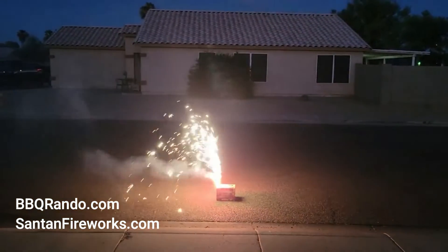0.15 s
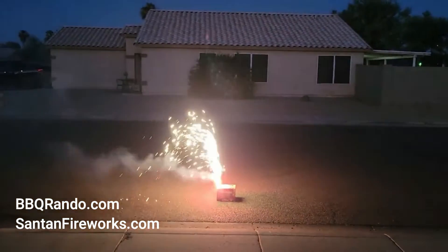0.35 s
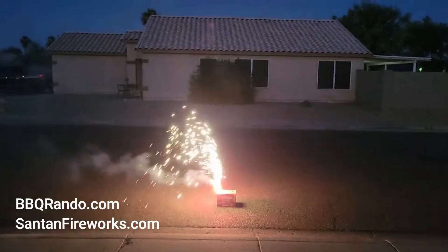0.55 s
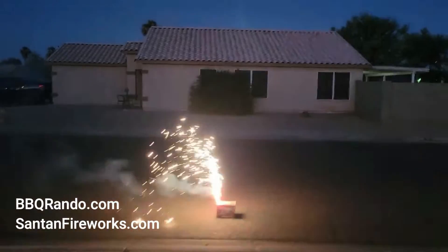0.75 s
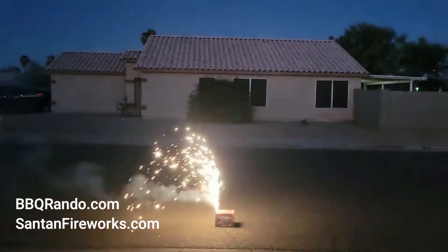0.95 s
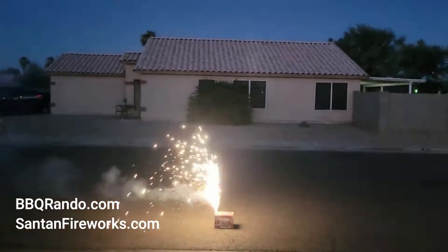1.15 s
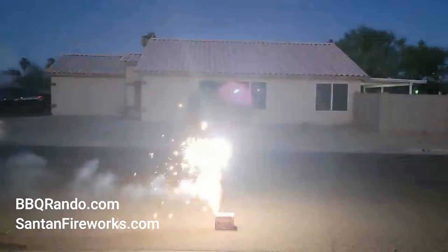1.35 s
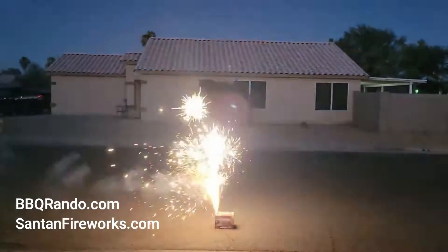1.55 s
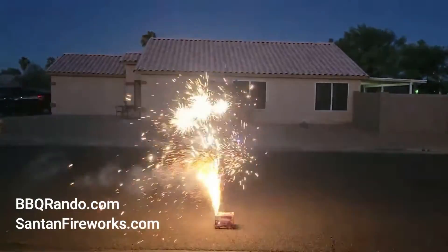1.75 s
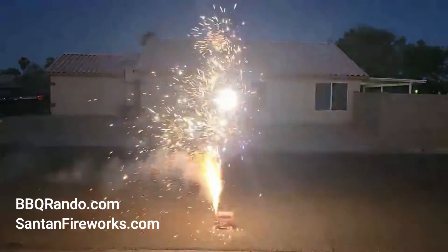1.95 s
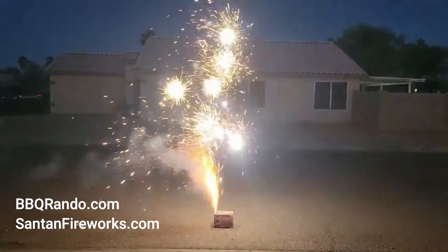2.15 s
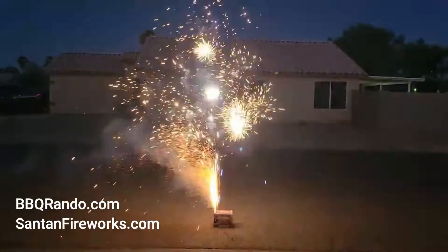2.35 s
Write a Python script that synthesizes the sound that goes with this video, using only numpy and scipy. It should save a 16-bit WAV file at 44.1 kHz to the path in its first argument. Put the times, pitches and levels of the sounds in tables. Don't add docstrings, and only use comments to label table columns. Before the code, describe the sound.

A ground firework fountain roars softly with small spits, nearly dies at one second, then a brighter hiss builds and bursts into loud, dense crackling, outdoors on a quiet street, captured by a phone a few metres away.

```python
import sys
import numpy as np
from scipy import signal
from scipy.fft import rfft, irfft
from scipy.io import wavfile
from scipy.ndimage import uniform_filter1d

SR = 44100
rng = np.random.default_rng(int(sys.argv[2]) if len(sys.argv) > 2 else 0)


def gain_from_decibels(decibels):
    exponent = np.asarray(decibels, float) / 20
    return 10 ** exponent


def unload_wav(signal):
    wavfile.write(
        sys.argv[1],
        SR,
        np.round(np.clip(np.atleast_2d(signal).T, -1, 1) * 32767).astype(np.int16),
    )


N = 110250
TIME = np.arange(N) / SR


def read(points, hz):
    f, value = np.transpose(points)
    return np.interp(np.log(hz + 1), np.log(f + 1), value)


def evened(x):
    return x / np.sqrt(np.mean(x ** 2) + 1e-20)


def curve(points):
    s, db = np.transpose(points)
    return gain_from_decibels(np.interp(TIME, s, db))


def causal(db):
    log_gain = np.log(gain_from_decibels(np.concatenate([db, db[-2:0:-1]])))
    return np.exp(log_gain - 1j * signal.hilbert(log_gain).imag)[:len(db)]


def tinted(x, tone):
    taps = irfft(causal(read(tone, np.fft.rfftfreq(4096, 1 / SR))))[:3000]
    return signal.oaconvolve(x, taps[None] / np.linalg.norm(taps))[:, :N]


def wander(top_hz):
    waves = [np.sin(2 * np.pi * (f * TIME + rng.random())) / np.sqrt(f)
             for f in np.geomspace(3, top_hz, num=24)]
    return evened(sum(waves))


def snaps(per_s, spread_db):
    size = gain_from_decibels(spread_db * np.minimum(rng.exponential(size=N), 4))
    size = size * (rng.random(N) < per_s / SR)
    return evened(size * rng.standard_normal((2, N)))


def shape(start, length, rise, fall):
    t = TIME - start
    return np.clip(t / rise, 0, 1) ** 2 * np.exp(-np.maximum(t - length, 0) / fall)


def jet(level, tone, flutter_db, grit, like):
    gas = rng.standard_normal((2, N)) + grit * snaps(1500, 3.5)
    gas = np.array([gas[0], like * gas[0] + np.sqrt(1 - like ** 2) * gas[1]])
    return tinted(evened(gas) * curve(level) * gain_from_decibels(flutter_db * wander(120)), tone)


# (frequency [Hz], level [dB])
STREET_TONE = [(22, -26), (40, -5), (58, -8), (120, -13.5), (250, -31.5), (600, -21.5), (3000, -51),
               (16000, -43)]


def street_rumble():
    return gain_from_decibels(-46.5 + 1.7 * wander(8.2)) * tinted(rng.standard_normal((2, N)), STREET_TONE)


# (time [s], level [dB])
ROAR_LEVEL = [
    (0, -36),
    (.25, -37),
    (.5, -36.5),
    (.8, -35.5),
    (.97, -37.5),
    (1.03, -47),
    (1.3, -51),
    (2.5, -81.5),
]
# (frequency [Hz], level [dB])
ROAR_TONE = [(130, -7), (700, -6), (1050, -14), (1800, -5.5), (2700, -9.5), (3250, -17), (4600, -18.5),
             (16000, -37)]


def roar():
    x = jet(ROAR_LEVEL, ROAR_TONE, flutter_db=0.73, grit=0.48, like=.12)
    open_s, shut_hz, shut_share = 0.29, 2120, 0.9
    shut = np.clip(shut_share * (1 - TIME / open_s), 0, 1)
    muffled = signal.filtfilt(*signal.butter(3, shut_hz, fs=SR), x)
    return x + shut * (muffled - x)


# (frequency [Hz], level [dB])
WHISPER_TONE = [(2700, -10), (3300, 0), (4000, 10.5), (4600, 8.5), (5300, -11), (6800, -3), (10500, -11),
                (12500, -25)]


def whisper():
    start_db, fall_db_per_s = -37.5, 30
    return tinted(rng.standard_normal((2, N)) * gain_from_decibels(start_db - fall_db_per_s * TIME), WHISPER_TONE)


# (time [s], level [dB])
HISS_LEVEL = [
    (0, -51),
    (.3, -71),
    (.9, -78),
    (1.03, -41.5),
    (1.3, -36.5),
    (1.46, -33.5),
    (1.53, -31),
    (1.7, -32),
    (2.2, -33),
    (2.5, -31.5),
]
# (frequency [Hz], level [dB])
HISS_TONE = [(500, -5.5), (1400, -1), (2300, 11.5), (3400, 3.5), (6000, 5.5), (10500, -5.5), (13500, -7.5),
             (16000, -15.5)]


def hiss():
    return jet(HISS_LEVEL, HISS_TONE, flutter_db=2.1, grit=0.32, like=.4)


# (time [s], level [dB], length [s])
SPITS = [(.324, -31, .002), (.3765, -29, .0015), (.608, -28, .0035), (.6358, -25, .0012),
         (.7752, -29, .003), (.7832, -25, .002), (.796, -35, .0015), (.838, -32, .002), (.918, -36, .002),
         (.9443, -31, .002), (.583, -36, .002), (.258, -38, .002), (.394, -37, .0015), (.961, -34, .002),
         (1.255, -31, .002), (1.447, -28, .002), (1.475, -22, .002)]
# (frequency [Hz], level [dB])
SPIT_TONE = [(300, -8), (1400, 2), (2500, 4.5), (5000, 7.5), (8000, -8), (11000, -6.5), (14000, -15),
             (16500, -10)]


def spits():
    level = sum(gain_from_decibels(db - .5) * shape(s, n, rise=.0003, fall=.0006) for s, db, n in SPITS)
    return tinted(level * snaps(26000, 0), SPIT_TONE)


# (time [s], level [dB], length [s], thump level [dB])
POPS = [(1.518, -21, .003, -47), (1.5455, -11, .006, -42), (1.552, -13, .005, -46), (1.560, -18, .002, -60),
        (1.565, -13, .004, -32), (1.632, -12, .008, -34), (1.653, -11, .005, -42), (1.757, -15, .006, -40),
        (1.8145, -8, .005, -42), (1.822, -10, .004, -38), (1.854, -14, .004, -40), (1.895, -14, .007, -41),
        (1.9965, -10, .005, -48), (2.0355, -10, .004, -39), (2.042, -9, .006, -39), (2.0795, -7, .006, -41),
        (2.1225, -11, .005, -43), (2.1685, -14, .003, -46), (2.294, -16, .004, -40),
        (2.308, -13, .004, -28), (2.350, -15, .004, -42), (2.362, -9, .006, -38), (2.450, -13, .006, -44),
        (2.479, -11, .004, -41)]


def thumps():
    thump_hz, thump_s = 90, .006
    out = 0
    for s, _, _, db in POPS:
        u = np.maximum(TIME - s, 0)
        swell = u / thump_s * np.exp(-u / thump_s)
        out = out + gain_from_decibels(db + 5.5) * swell * np.sin(2 * np.pi * thump_hz * rng.uniform(1.0, 1.02) * u)
    return out


# (time [s], length [s], level [dB], low part relative to that level [dB])
SWARMS = [(1.572, .055, -35, -2), (1.640, .028, -28, 1), (1.672, .03, -32, 0), (1.700, .045, -25, 2),
          (1.742, .022, -27, 0), (1.783, .018, -28, 2), (1.826, .010, -26, 2), (1.857, .035, -27, 0),
          (1.893, .035, -25, -1), (1.931, .040, -23.5, 0), (1.998, .022, -23, 1), (2.044, .024, -24, 2),
          (2.083, .032, -24, 0), (2.126, .022, -31, -2), (2.145, .022, -28, 1), (2.205, .065, -32, -4),
          (2.164, .040, -23, 3), (2.268, .05, -24, 6), (2.318, .050, -22, 2), (2.380, .030, -25, 1),
          (2.415, .03, -33, -2), (2.444, .030, -25, 4), (2.484, .02, -30, 2)]
# (frequency [Hz], level [dB])
SNAP_TONE = [(80, -1.5), (350, -4), (1400, 0), (3000, 2), (5500, 8.5), (9000, -0.5), (13000, 0.5),
             (16500, -7)]


def stars():
    pops = sum(gain_from_decibels(db - 9) * shape(s, n, .3 * n, .003) for s, db, n, _ in POPS)
    swarms, lows = 0, 0
    for s, n, db, low_db in SWARMS:
        burst = shape(s, n, rise=.009, fall=.008)
        swarms = swarms + gain_from_decibels(db + 1.07) * burst
        lows = lows + gain_from_decibels(db + low_db + 0.6) * burst
    cloud = gain_from_decibels(1.3 * wander(300)) * snaps(14000, 1.1)
    deep = signal.lfilter(*signal.butter(2, 3200, fs=SR), cloud)
    crackle = pops * snaps(26000, 1.6) + swarms * (cloud - deep) + lows * deep
    return tinted(crackle, SNAP_TONE) + thumps()


def patchy(x):
    z = signal.stft(x, SR, nperseg=256)[2]
    field = uniform_filter1d(rng.standard_normal(z.shape[1:]), size=14, axis=0)
    field = uniform_filter1d(field, size=7, axis=1)
    return signal.istft(z * gain_from_decibels(2.5 * evened(field)), SR, nperseg=256)[1][:, :N]


# (time [s], peak level [dB])
CRACKS = [(1.5477, -10.0), (1.5508, -10.0), (1.5541, -11.0), (1.5558, -11.0), (1.5681, -10.0),
          (1.6341, -9.0), (1.6574, -9.0), (1.74, -9.0), (1.7571, -12.0), (1.7616, -12.0), (1.8157, -8.0),
          (1.8171, -8.0), (1.8234, -9.0), (1.8252, -7.0), (1.8298, -10.0), (1.8563, -12.0), (1.8959, -12.0),
          (1.898, -12.0), (1.9119, -13.0), (1.9978, -7.0), (2.0, -6.0), (2.0196, -11.0), (2.0365, -8.0),
          (2.0398, -10.0), (2.0435, -10.0), (2.0449, -8.0), (2.0494, -10.0), (2.083, -5.0), (2.0896, -11.0),
          (2.0964, -11.0), (2.1121, -11.0), (2.1239, -10.0), (2.1258, -10.0), (2.1697, -7.0), (2.18, -11.0),
          (2.1814, -11.0), (2.1838, -10.0), (2.1893, -10.0), (2.1948, -11.0), (2.1966, -11.0),
          (2.2812, -12.0), (2.2922, -10.0), (2.2979, -10.0), (2.3097, -9.0), (2.3113, -9.0),
          (2.3344, -11.0), (2.3463, -12.0), (2.3507, -11.0), (2.3529, -10.0), (2.3601, -10.0),
          (2.3657, -6.0), (2.3673, -8.0), (2.3919, -13.0), (2.4538, -12.0), (2.4562, -12.0),
          (2.4661, -13.0), (2.4807, -11.0), (2.4822, -9.0)]


def cracks():
    out = np.zeros((2, N))
    u = np.arange(40) / SR / .00007
    wave = (1 - u) * np.exp(-u)
    for (s, db), (late, slow) in zip(CRACKS, rng.random((len(CRACKS), 2))):
        for row, lag in zip(out, (0, 0.00049 * late)):
            row[round((s + lag) * SR):][:40] -= gain_from_decibels(db + 2.5) * (wave + slow * np.roll(wave, 3))
    return tinted(out, SNAP_TONE)


def houses(x):
    echo_db, t60_s, top_hz = -9, 0.54, 13400
    t = np.arange(SR // 2) / SR
    hits = (rng.random((2, len(t))) < .05) * (t > .008)
    taps = rng.standard_normal((2, len(t))) * hits * gain_from_decibels(-60 * t / t60_s)
    taps = signal.lfilter(*signal.butter(1, top_hz, fs=SR), taps)
    return gain_from_decibels(echo_db) * signal.fftconvolve(x, taps / np.linalg.norm(taps[0]), axes=1)[:, :N]


def scene():
    fire = roar() + whisper() + hiss() + spits() + patchy(stars()) + cracks()
    return fire + houses(fire) + street_rumble()


# (frequency [Hz], level [dB])
LEFT_TONE = [(600, 2), (1300, 2.5), (2400, 6.5), (3300, -1.5), (5200, -6), (7500, 1.5), (10500, 0),
             (13500, 5)]
RIGHT_TONE = [(1700, 3), (3200, -5.5), (4200, -3), (5500, 0.5), (7400, -2), (8900, -2.5), (11000, -3.5),
              (13500, 4)]
# (frequency [Hz], phase [rad])
LEAD = [(200, 0.22), (2500, 0.7), (3300, 1.68), (4400, 2.36), (6000, 2.1), (8000, 1), (9500, -.4),
        (15000, -.6)]
# (frequency [Hz], correlation [0-1])
SAME = [(40, .8), (200, .96), (550, .66), (1700, .88), (2600, .74), (3300, .35), (4300, .76), (9000, .25)]
# (frequency [Hz], width [Hz], level [dB])
DIPS = [(549, 81, -6.5), (962, 142, -4), (8310, 190, -6), (11320, 700, -5.5)]


def microphone(dry):
    hz = np.fft.rfftfreq(N, 1 / SR)
    dips_db = sum(db * np.exp(-((hz - f) / width) ** 2) for f, width, db in DIPS)
    low_cut = hz ** 2 / (hz ** 2 + 51.5 ** 2)
    a, b = rfft(dry, axis=1) * gain_from_decibels(dips_db) * low_cut
    same = np.clip(read(SAME, hz), 0, 1)
    lead = np.exp(.5j * read(LEAD, hz))
    left = a * gain_from_decibels(read(LEFT_TONE, hz)) * lead
    right = (same * a + np.sqrt(1 - same ** 2) * b) * gain_from_decibels(read(RIGHT_TONE, hz)) / lead
    return irfft(np.array([left, right]) / (1 + (hz / 15850) ** 400), N, axis=1)


def rebalanced(ports):
    centre_hz, width_hz, share, away_s = 2100, 420, 0.93, 0.55
    edges = [centre_hz - width_hz, centre_hz + width_hz]
    band = signal.filtfilt(*signal.butter(1, edges, "band", fs=SR), ports)
    return ports + np.clip(share * (1 - TIME / away_s), 0, 1) * band * [[.4], [-1]]


def gate(ports):
    band_bins, gate_db, gate_share = 6, -3.8, .4
    mid_side = [ports[0] + ports[1], ports[0] - ports[1]]
    hz, _, z = signal.stft(mid_side, SR, nperseg=1024, noverlap=768)
    band = np.arange(len(hz)) // band_bins
    power = uniform_filter1d(abs(z) ** 2, size=5, axis=2)
    power = np.add.reduceat(power, np.arange(0, len(hz), band_bins), axis=1)
    around = np.maximum(power[1], uniform_filter1d(power[0], size=7, axis=0))
    total = power[0].sum(axis=0)
    lull = (total > .7 * np.median(total)) & (total < .8 * uniform_filter1d(total, size=40))
    bands, frames = around.shape
    chance = rng.random((bands, frames // 4 + 1)) < gate_share
    now = np.repeat(chance, 4, axis=1)[:, :frames] | lull
    weak = now & (power[0] < around * gain_from_decibels(2 * gate_db))
    drop = weak[band] & (hz[:, None] > 3300) & (hz[:, None] < 14350)
    gated = [z[0] * np.where(drop, .03, 1), z[1]]
    mid, side = signal.istft(gated, SR, nperseg=1024, noverlap=768)[1][:, :N]
    return np.array([mid + side, mid - side]) / 2


def band_limit(x):
    return signal.sosfilt(signal.butter(12, 17000, fs=SR, output="sos"), x)


def record(dry):
    mix = gate(rebalanced(microphone(dry)))
    return band_limit(mix)


dry = scene()
out = record(dry)
unload_wav(out)
```